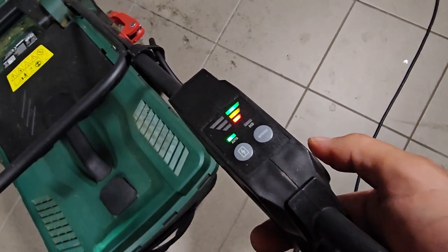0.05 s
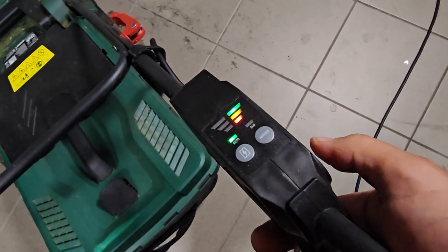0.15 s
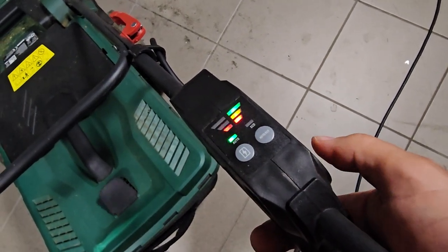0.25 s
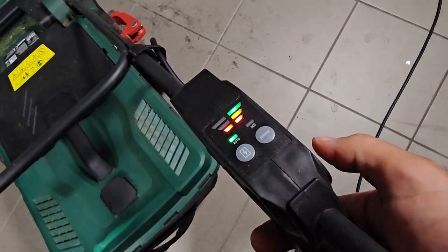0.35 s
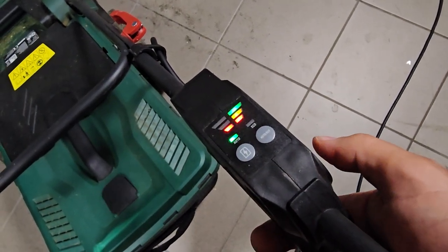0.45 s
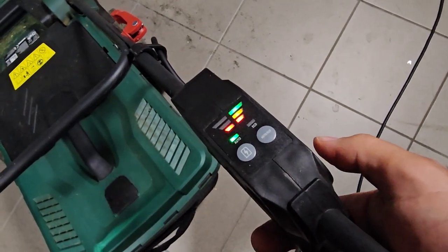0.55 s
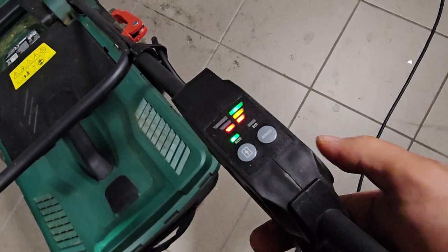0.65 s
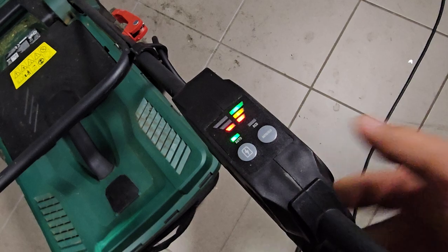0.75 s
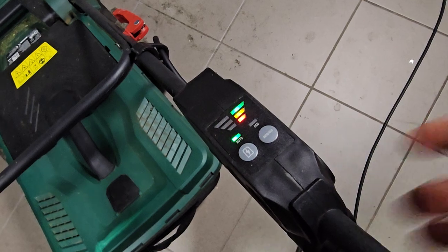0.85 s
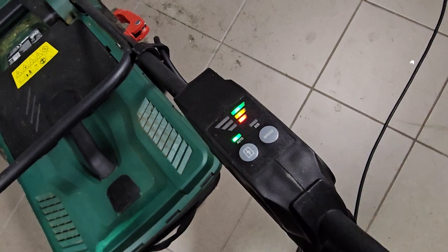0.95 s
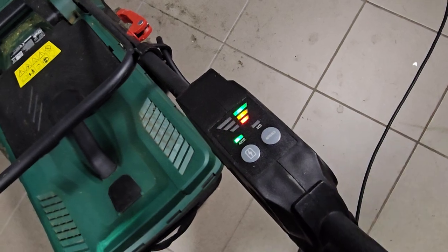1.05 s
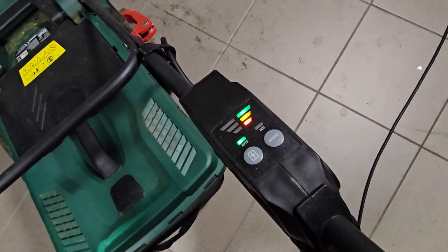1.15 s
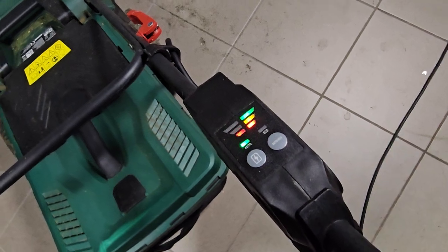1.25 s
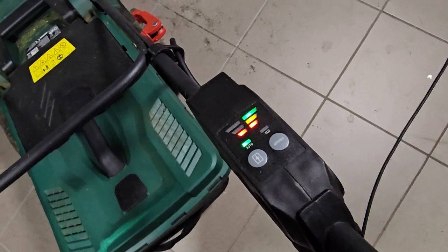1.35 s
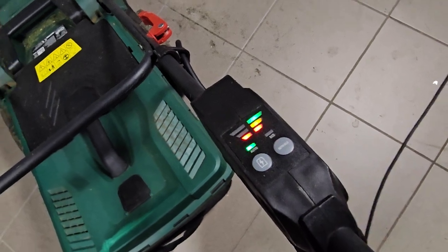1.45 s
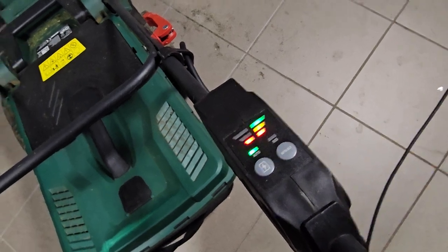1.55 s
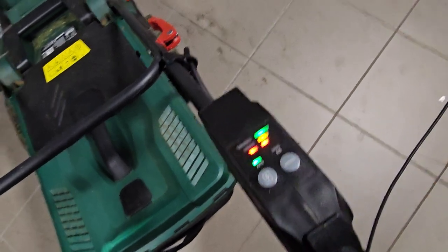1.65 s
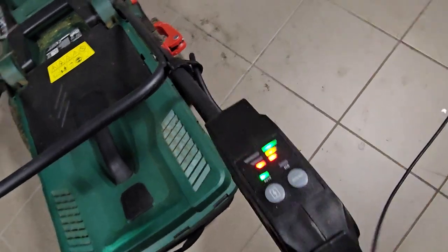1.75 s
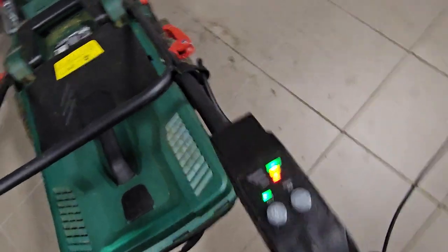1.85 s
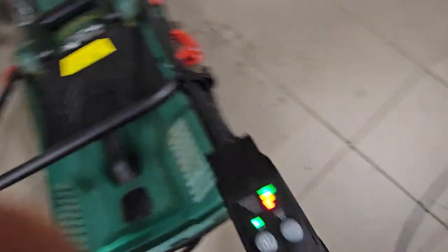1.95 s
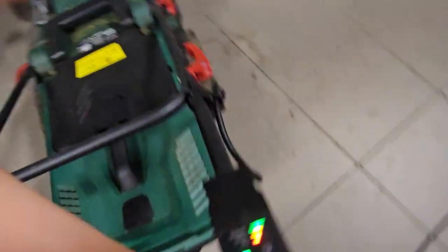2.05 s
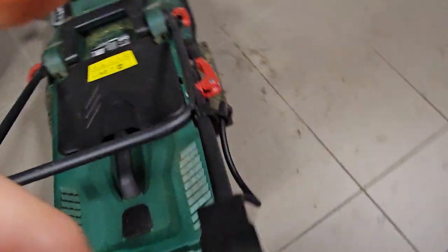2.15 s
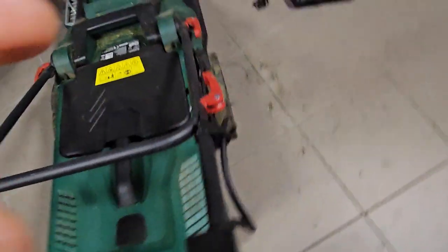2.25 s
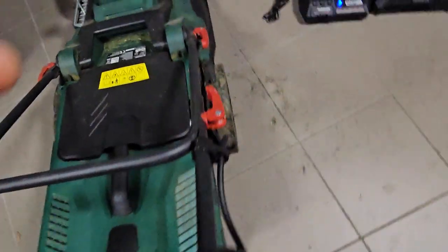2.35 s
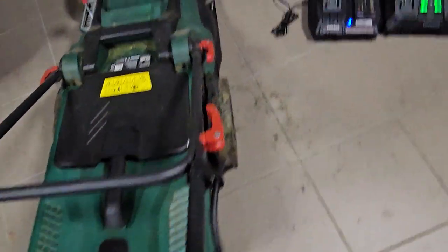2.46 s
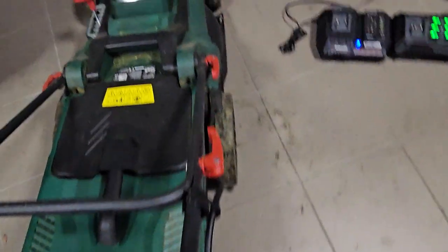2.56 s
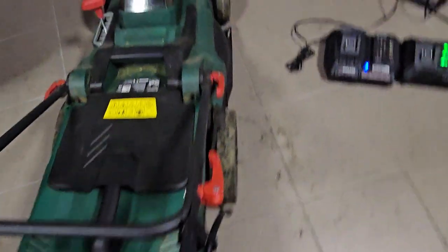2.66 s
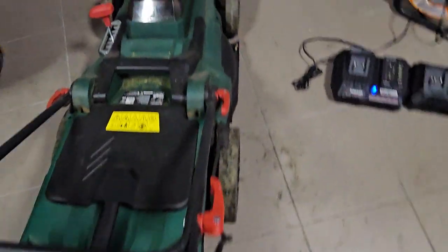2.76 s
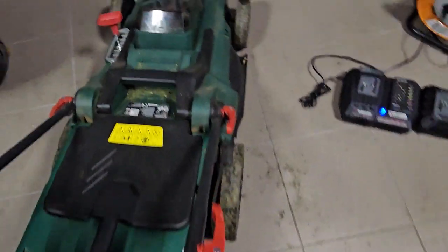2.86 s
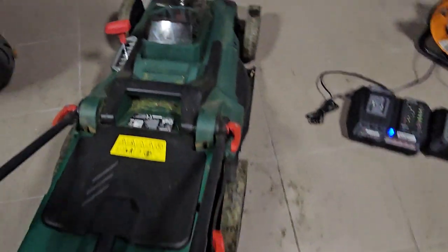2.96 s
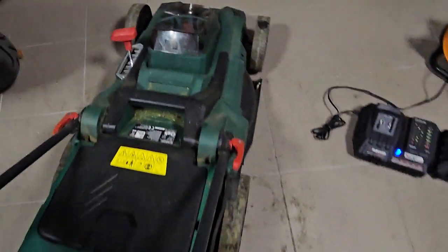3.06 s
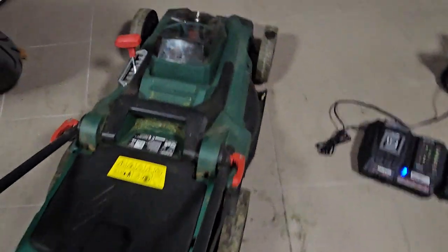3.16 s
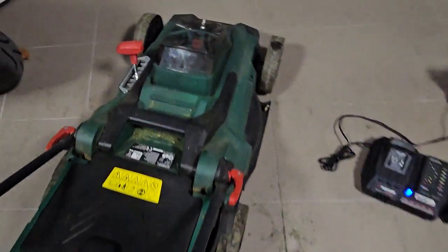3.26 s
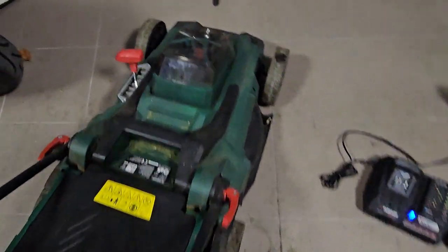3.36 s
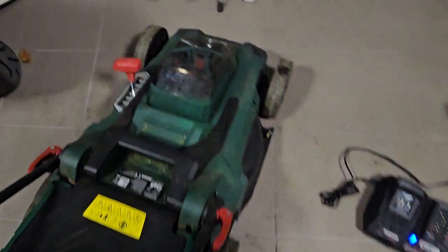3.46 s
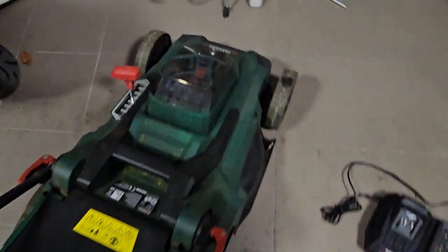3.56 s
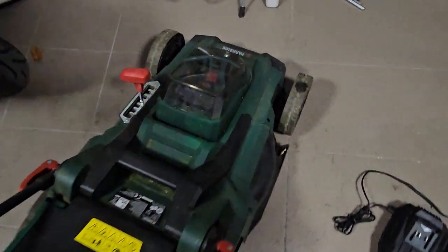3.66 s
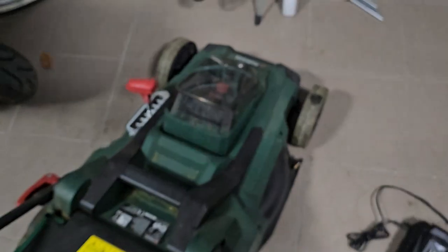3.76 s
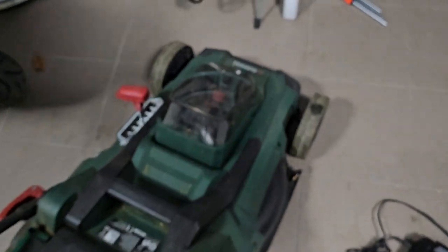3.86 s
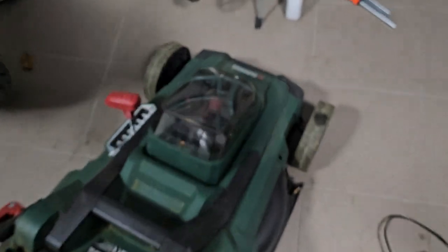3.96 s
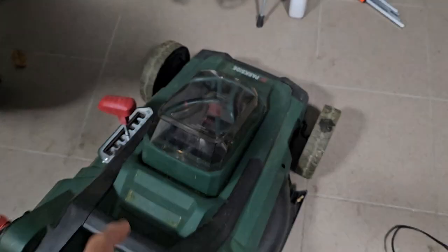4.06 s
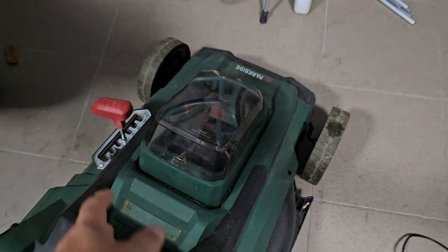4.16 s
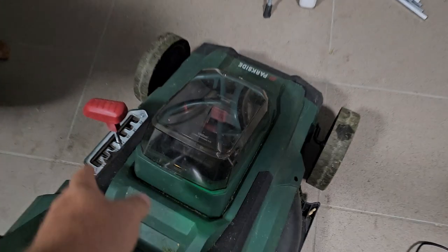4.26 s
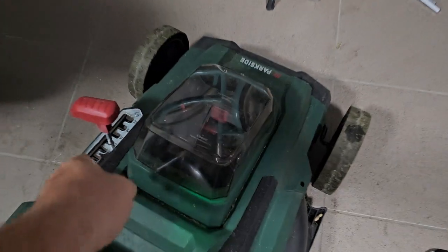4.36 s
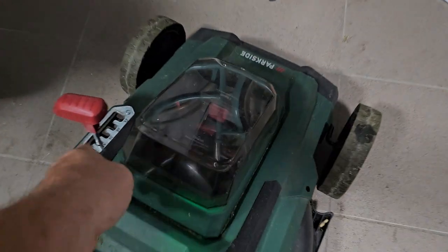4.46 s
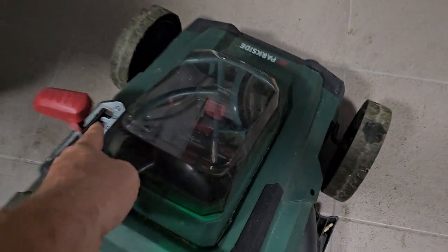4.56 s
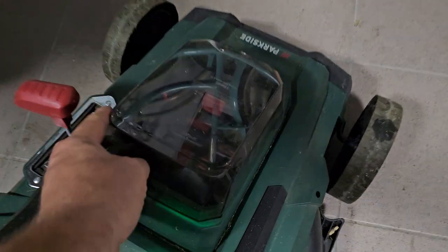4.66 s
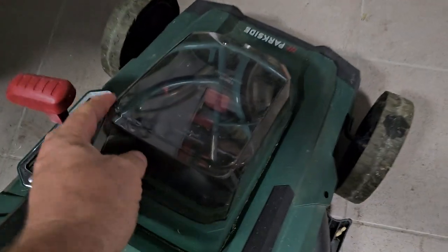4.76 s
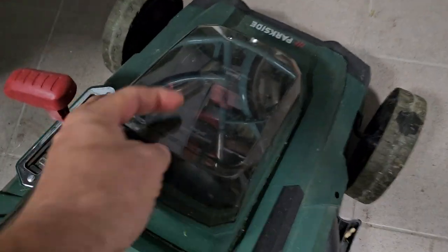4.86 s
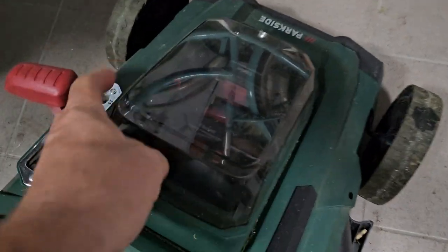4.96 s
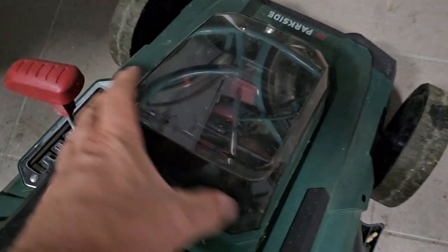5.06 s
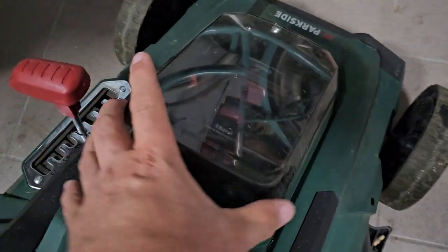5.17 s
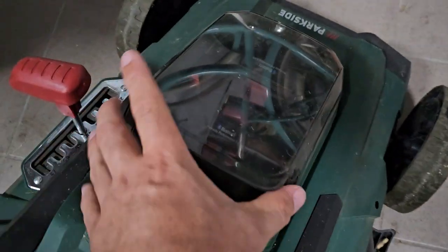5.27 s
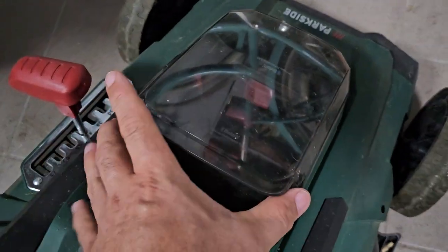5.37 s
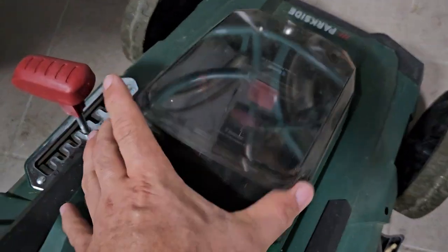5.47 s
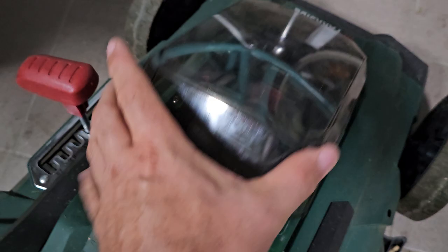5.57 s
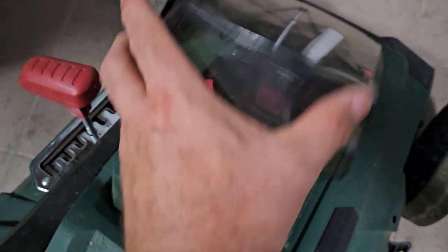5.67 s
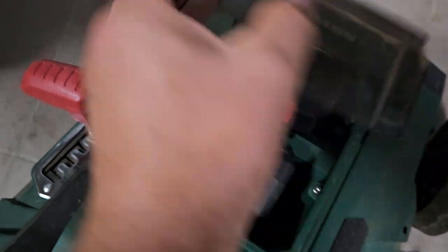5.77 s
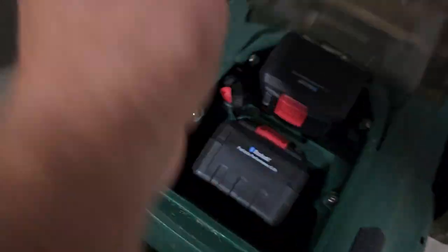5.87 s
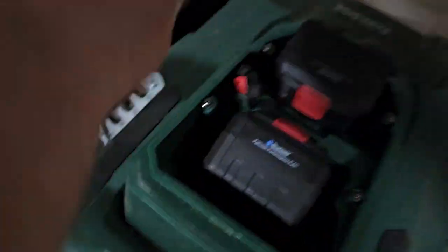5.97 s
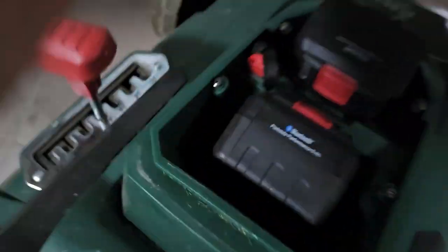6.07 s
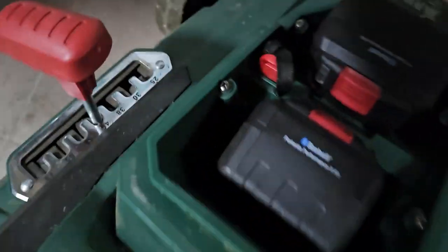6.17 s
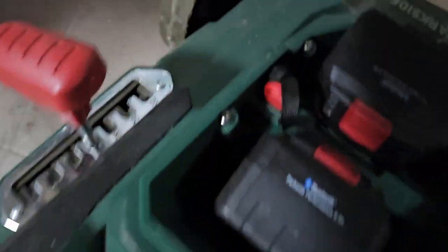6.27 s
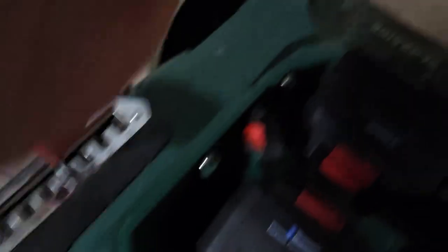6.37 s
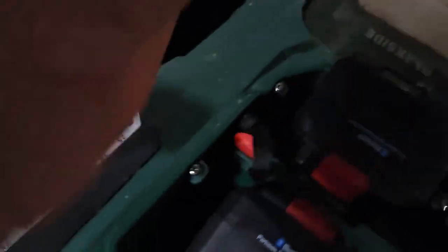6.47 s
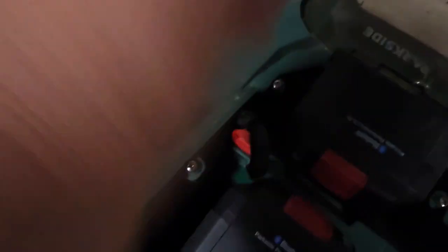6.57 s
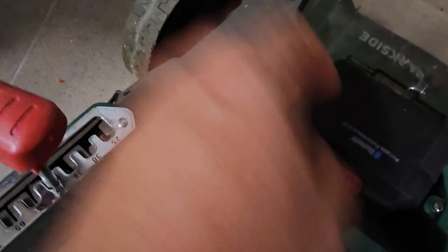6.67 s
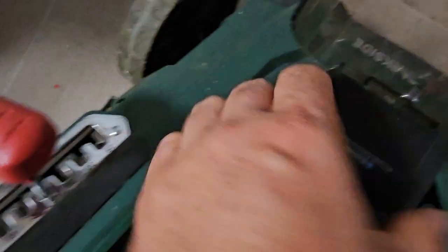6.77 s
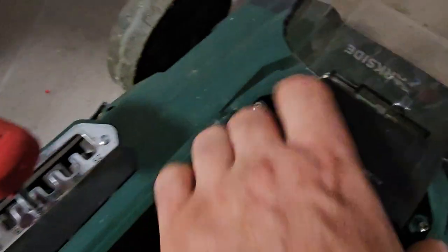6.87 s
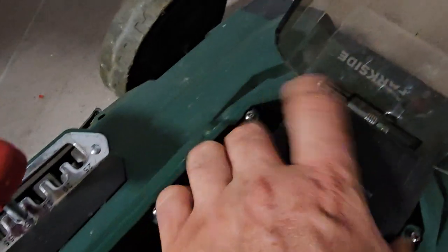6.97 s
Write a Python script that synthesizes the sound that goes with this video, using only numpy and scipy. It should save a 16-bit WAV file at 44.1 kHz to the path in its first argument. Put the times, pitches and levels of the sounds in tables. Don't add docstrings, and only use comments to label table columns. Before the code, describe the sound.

A mower motor whines down and rattles to a stop indoors, then a lever creaks and snaps, with rustling and plastic knocks at a lid.

```python
import sys
import numpy as np
from scipy import signal
from scipy.fft import rfft, irfft
from scipy.io import wavfile
from scipy.ndimage import uniform_filter1d

SR = 44100
rng = np.random.default_rng(int(sys.argv[2]) if len(sys.argv) > 2 else 0)


def level_to_linear(level):
    exponent = np.asarray(level, float) / 20
    return 10 ** exponent


def output_pcm(signal):
    pcm = np.clip(np.atleast_2d(signal).T, -1, 1) * 32767
    wavfile.write(sys.argv[1], SR, np.round(pcm).astype(np.int16))


N = 310023
T = np.arange(N) / SR
RUN = 2 * SR

# (frequency [Hz], level [dB per Hz])
AIR_COLOUR = [(22, -22), (40, -1.5), (60, -9), (193, -26.5), (310, -15.5), (421, -35.5), (512, -18.5),
              (1060, -30), (1850, -22), (2450, -34), (3730, -33), (7510, -37.5), (16000, -40.5)]
AIR_DB = -60.5
# (frequency [Hz], likeness [0-1])
PORT_LIKENESS = [(60, 0.91), (180, 0.92), (550, 0.73), (1650, 0.028), (4970, 0.01), (15000, 0.077)]
# (frequency [Hz], 60 dB decay [s])
WALL_DECAY = [(100, 0.22), (500, 0.61), (2000, 0.45), (6000, 0.13), (15000, 0.04)]
# (shut [s], open [s], depth [dB])
PAUSES = [
    (-3.5, 1.66, -12),
    (3.07, 3.315, -9),
    (3.74, 4.042, -7),
    (4.55, 8, -11.5),
]
# (frequency [Hz], turn [radians])
PORT_PHASE = [(600, 0), (1380, 1.7), (3000, 2)]
MOWER_WET_DB, FAR_WET_DB, NEAR_WET_DB, KNEEL_S = -20, -13, -22, 4.4

# (time [s], left over right [dB])
HAND_SIDE = [(1.6, 1), (2.2, 0.5), (3, -1), (4.3, -3), (4.8, -0.5), (5.6, -1), (6.1, -1.5), (7, -1)]
# (frequency [Hz], level [dB per Hz])
CLOTH_COLOUR = [(300, -25.5), (700, -17.5), (1500, -4.5), (3500, -1), (7500, -2.5), (11000, -7),
                (15500, -7), (16500, -32)]
# (frequency [Hz], level [dB per Hz])
CASING_COLOUR = [(40, -25), (90, -9), (170, 1.5), (270, -1), (370, -15), (600, -24), (1200, -58.5)]
# (peak [s], level [dB], rise [s per 20 dB], fall [s per 20 dB])
GRIP_SHIFTS = [(1.9, -62.5, 0.65, .1), (1.944, -50, 0.088, 0.19), (2.42, -48.5, .03, .05),
               (2.75, -55, 0.055, 0.18), (3.44, -59, 0.036, 0.36), (4.25, -61, 0.42, 0.66),
               (4.455, -50, 0.02, 0.1), (4.71, -52, 0.047, 0.44), (4.92, -35.5, 0.11, 0.17),
               (5.05, -44.5, 0.047, 0.3), (5.5, -53.5, 0.85, 0.2), (5.728, -57.5, 0.27, 0.99),
               (6.422, -52.5, 0.0207, 0.13), (6.602, -53.5, 0.17, 0.028), (7.0, -57, 0.29, .3),
               (4.83, -48, .03, .05), (5.125, -42.5, .03, .06), (6.18, -53.5, .06, 0.084)]
# (peak [s], level [dB], rise [s per 20 dB], fall [s per 20 dB])
SLEEVE_RUBS = [(1.67, -63, .008, .3), (1.77, -51, .09, .25), (2.09, -56, .4, .03), (2.23, -48.5, .1, .4),
               (2.43, -45, .03, .04), (2.762, -51, .02, .16), (3.026, -64.5, .2, .2),
               (3.452, -56.5, .03, .12), (3.638, -49.5, .2, .11), (4.047, -54, .005, .1),
               (4.068, -50, .04, .13), (4.342, -42, .05, .1), (4.365, -42, .06, .04),
               (4.644, -50, .085, .1), (4.96, -47.5, .18, .075), (5.4, -65, .6, .6),
               (5.942, -57.5, .25, .25), (6.25, -55.5, .45, .06), (6.982, -58, .05, .03),
               (6.3, -64, .1, .12), (6.5, -68, .1, .3), (6.932, -60, .005, .2), (6.86, -66, .01, .1)]
# (peak [s], level [dB], rise [s per 20 dB], fall [s per 20 dB])
FINGER_RUBS = [(1.96, -52.5, 0.034, 0.22), (2.13, -40.5, 0.036, 0.13), (3.374, -68, 0.17, 0.102),
               (3.532, -57, 0.032, 0.074), (4.222, -49, 0.14, 0.19), (4.472, -42.5, 0.052, 0.1),
               (5.106, -42.5, 0.099, 0.1), (5.58, -58, 0.17, 0.15), (5.794, -67.5, 0.066, 0.087),
               (6.075, -49.5, 0.078, 0.097), (6.42, -55, 0.0046, 0.14), (6.6, -54, 0.016, 0.048),
               (6.82, -64, .06, 0.18)]
SLEEVE_BODY_DB, FINGER_BODY_DB = -11, -3.5
# (peak [s], level [dB], rise [s per 20 dB], fall [s per 20 dB])
SCRAPES = [(5.562, -48, 0.027, 0.04), (5.59, -41.5, .02, .1), (5.775, -50.5, .01, 0.046),
           (4.785, -52, 0.013, 0.052), (5.672, -48, 0.033, 0.043), (5.805, -51.5, .05, 0.07),
           (6.472, -48, 0.021, 0.036), (6.57, -51.5, .01, 0.04), (6.602, -40, 0.012, 0.04),
           (6.78, -51.5, .006, 0.13), (4.3, -62, 0.33, 0.51), (5.3, -66.5, .3, 0.45),
           (5.42, -57.5, .02, .12), (5.93, -56, 0.011, .06), (6.02, -63, .3, .4),
           (6.075, -48.5, .04, 0.074), (6.828, -50, 0.047, 0.062), (6.94, -58, .02, 0.091),
           (6.982, -49.5, 0.028, 0.022)]
# (frequency [Hz], width [Hz], level [dB])
BAY_MODES = [(440, 92, 4), (900, 380, -2.5), (1324, 124, 1.5), (1990, 150, -3), (3260, 400, -9.5),
             (4300, 880, -8)]

# (frequency [Hz], level [dB per Hz])
LATCH_COLOUR = [(300, -40.5), (700, -16.5), (1930, 1), (2560, -8.5), (3600, -3), (5510, -9), (12900, -12),
                (16000, -28)]
# (time [s], level [dB], pitch [Hz], left over right [dB])
SNICKS = [(2.2, -55.5, 1200, 14.5), (2.103, -30, 3500, 1), (2.1085, -32.5, 3650, 1), (3.366, -55, 7400, -3),
          (3.317, -65.5, 7600, -6.5), (3.869, -64, 6340, -3.5), (3.965, -68, 9000, -2.5),
          (4.4, -49.5, 1960, -3.5), (5.057, -51.5, 2500, -0.5), (6.219, -58, 11000, 1.5),
          (6.243, -55.5, 7000, 1.5), (6.86, -66.5, 11300, -0.5), (3.543, -42.5, 1320, -4),
          (4.211, -39, 1900, -1.5), (4.499, -46.5, 1450, -1.5), (4.96, -40, 2100, 1), (4.3, -50, 1482, -3),
          (6.422, -44, 2000, 2), (1.972, -44.5, 3000, 5), (2.1, -62, 3000, 5), (1.915, -51, 6000, 4),
          (5.573, -43.5, 7920, 0), (6.731, -66, 5000, -1.5), (6.984, -51.5, 4460, -0.5)]
# (time [s], level [dB], pitch [Hz], left over right [dB])
TAPS = [(2.103, -16, 3290, 1), (2.103, -24, 4384, 2), (2.103, -24, 7800, 1.5), (2.103, -21, 11000, 1),
        (2.1085, -18.5, 3210, 1.5), (2.1085, -21.5, 4300, 0.5), (2.1085, -25.5, 7540, 2.5),
        (2.1085, -22, 10500, 3), (1.83, -41, 815, 2.5), (1.95, -39.5, 5310, 4.5), (1.972, -36.5, 1210, 10),
        (1.998, -44, 900, 5), (2.022, -31.5, 580, 5), (2.033, -39.5, 1500, 4), (2.243, -35, 1057, -4.5),
        (2.325, -47.5, 1170, -7.5), (2.779, -40.5, 1620, -9.5), (2.857, -37, 1200, -4.5),
        (2.912, -36.5, 1310, -8), (3.014, -49, 1974, -1), (3.526, -37, 1100, -2), (3.317, -52, 1550, -7),
        (3.345, -44.5, 1576, -8.5), (3.367, -47.5, 2150, -3), (3.22, -56.5, 1850, -3),
        (3.26, -58, 1850, -3), (4.172, -43, 1660, -2), (4.197, -46, 2130, -4), (4.453, -42, 1430, -2.5),
        (5.772, -45, 1320, -2.5), (5.875, -47, 1200, -3.5), (5.924, -46.5, 1600, -2),
        (6.052, -46.5, 1490, -0.5), (4.099, -43.5, 1525, -14), (4.78, -42, 670, 2.5), (4.873, -36, 3200, 5),
        (6.264, -49, 664, -5), (6.466, -48, 890, 5), (6.931, -52, 3780, 1)]
SNICK_CRACK_DB, TAP_CRACK_DB = 11.5, -13
# (time [s], level [dB], treble [dB], thud [dB], ring length [factor])
KNOCKS = [(1.948, -43, -12, -3, 0.57), (2.028, -43, 4, -7.5, 0.2), (4.697, -55.5, -34, 5.5, 0.6),
          (5.057, -47, -20.5, -3, .5), (5.412, -55, -12.5, -6, 0.69), (4.881, -39, -14, -23, 0.41),
          (4.898, -34, -28, -21, 0.48), (4.913, -22.5, -16, -25, 0.3), (4.942, -41, -13, 4, 0.46),
          (5.117, -49, -14, -3.5, 0.73), (5.572, -20, -14, -32, 0.67), (5.584, -17, -4.5, -45, 0.66),
          (5.592, -16.5, -31, -46, 0.7), (5.611, -22.5, -31, -37, 0.9), (5.805, -42.5, -19.5, -19, 0.62),
          (6.071, -44, -10, -24, 0.62), (6.262, -55.5, -10, 2.5, .2), (6.423, -40, -5, 4, 0.93),
          (6.56, -42, -9, -10.5, 0.314)]
# (frequency [Hz], level [dB], 60 dB decay [s])
LID_MODES = [(193.4, -2.5, 0.13), (264, -4.5, 0.11), (362, -4.5, 0.036), (456, 0.5, 0.11), (684, 2, 0.026),
             (1170, -1, 0.15), (1330, 0.5, 0.14), (2010, -6, 0.08), (2210, -8.5, 0.085), (3272, -21, 0.15)]
# (frequency [Hz], level [dB], 60 dB decay [s])
CATCH_MODES = [(205.5, -47, .2), (443, -43, .14), (870, -46, .06), (1491, -37.5, .13), (2090, -42, .1),
               (3400, -47, .2)]
CATCH_S = 6.594
# (frequency [Hz], level [dB], 60 dB decay [s])
SPRING_MODES = [(1070, -3, 0.2), (2756, -14, 0.1), (3284, -8, 0.11), (3898, -12, 0.07), (4400, -16, 0.06)]
SPRING_S, SPRING_DB = 5.658, -42

# (time [s], level [dB], slip rate [slips per s])
CREAK = [
    (2.21, -74, 95),
    (2.26, -50, 100),
    (2.33, -57, 100),
    (2.38, -62.5, 200),
    (2.42, -59.5, 160),
    (2.439, -43.5, 180),
]
# (frequency [Hz], width [Hz], level [dB])
HINGE_MODES = [(3030, 70, 7), (4500, 300, -2), (7900, 500, 2)]
SNAP_S, SNAP_DB = 2.4403, 1
# (frequency [Hz], level [dB per Hz])
BUZZ_COLOUR = [(88, -70.5), (150, -20), (328, -14.5), (544, -19.5), (1290, -20.5), (1700, -18), (1940, -9),
               (2810, -17.5), (4320, -14.5), (6630, -22.5), (16000, -27)]
BUZZ_DB = -26.5
# (frequency [Hz], level [dB], 60 dB decay [s])
BAR_MODES = [(265, -47, .7), (325, -28, 0.14), (1810, -52, 0.2), (1360, -52, 0.25)]
# (frequency [Hz], level [dB], 60 dB decay [s], touched after [s], pitch rise [Hz per s])
BAR_HUM = (296, -60, 4, .66, 150)

# (time [s], level
# [dB])
DECK_KNOCKS = [(0.523, -9.5), (0.538, -8.5), (1.035, -28), (1.079, -26.5), (1.118, -31.5), (1.191, -30.5),
               (1.249, -35), (1.365, -44), (1.417, -42)]
# (frequency [Hz], level [dB], 60 dB decay [s])
DECK_KNOCK_MODES = [(135, -12, .1), (242, -4, .09), (545, 2, .04), (711, -8, .04), (980, -15, .04)]
# (time [s], level [dB])
PINGS = [
    (1.034, -52.5),
    (1.052, -56),
    (1.085, -61),
    (1.105, -63.5),
]
# (frequency [Hz], level [dB], 60 dB decay [s])
BLADE_MODES = [(3365, -2, .3), (3400, -8, .2), (3758, 3, .2), (3800, -4, .12), (4134, -14, .2),
               (4721, -11, .35), (5770, -12, .12)]

# (frequency [Hz], level [dB per Hz])
RUSH_COLOUR = [(35, -43.5), (60, 1.5), (85, -12), (113, -11.5), (189, -6.5), (233, -3), (323, -1.5),
               (389, -12.5), (503, -8.5), (784, -18.5), (2460, -25), (7390, -38.5), (16000, -52)]
# (peak [s], level [dB], rise [s per 20 dB], fall [s per 20 dB])
JOLTS = [
    (.546, -18, 0.16, 0.096),
    (1.038, -39, .008, 0.2),
    (1.252, -51, .008, 0.12),
]
JOLT_AIR_DB = -11
# (peak [s], level [dB], rise [s per 20 dB], fall [s per 20 dB])
BRAKE_HISS = (.82, -44, .6, .05)
RATTLE_DB, RATTLE_LAW, RUSH_DB, RUSH_LAW, SETTLE_DB_PER_S = -17.5, 1, -23.5, 2.26, 135

COAST_HZ, COAST_HZ_PER_S, BRAKE_S, BRAKE_HZ_PER_S, REST_HZ = 91.66, 31, .53, 122, 11.5
# (multiple of shaft speed, level at full speed [dB])
SHAFT_ORDERS = [(2, -32.5), (3, -31), (5, -36.5), (6, -36.5), (7, -36)]
# (multiple of shaft speed, level over the magnet force [dB])
POLE_ORDERS = [(8, -11), (16, 1), (24, -1.5), (32, 0.5), (48, -7)]
# (time [s], level [dB])
MAGNET_FORCE = [(0, -50), (.3, -49), (.42, -37.5), (.54, -27.5), (.68, -32.5), (.78, -34), (.84, -28.5),
                (.9, -34.5), (1.04, -59.5)]
# (frequency [Hz], width [Hz], level [dB])
DECK_MODES = [(136, 10, -2.5), (240.8, 15, 0.5), (316, 6.9, -10), (469.3, 46, -6.5), (533, 120, -3.5),
              (571, 59, -14), (688, 42, -2), (1087, 31, -14), (1345, 200, -5), (1632, 70, -8.5),
              (2250, 80, 0), (2290, 370, -12)]
DIRECT_DB = -18
UNBALANCE_DB, UNBALANCE_LAW, BEAT_DB, BEAT_LAW = -20, 6.2, -25, 3.3
# (peak [s], level [dB], rise [s per 20 dB], fall [s per 20 dB])
MOUNT_SWELL = (.705, -31.5, .09, .07)
# (start [s], hold [s], level [dB], mode [Hz])
BOOMS = [(.607, .08, -10, 243), (.864, .011, -9, 550), (1.005, .03, -31, 250), (1.085, .03, -35, 250),
         (.905, .03, -21, 240), (.975, .04, -28, 140), (.805, .04, -24, 720), (.535, .07, -31, 2270)]
BOOM_SAG_DB, BOOM_EDGE_S, BOOM_SLIP = -5, .014, .7


def evened(x):
    return x / np.sqrt(np.mean(x ** 2) + 1e-20)


def smooth(x, size):
    return uniform_filter1d(x, size=size)


def filtered(x, order, hz, kind):
    return signal.sosfilt(signal.butter(order, hz, kind, fs=SR, output="sos"), x)


def read(points, hz):
    f, value = np.transpose(points)
    return np.interp(np.log(hz + 1), np.log(f + 1), value)


def columns(rows, count=N):
    fade = 0.0085
    s, *rest = np.transpose(rows)
    t = T[:count]
    gate = np.clip(np.minimum(t - s[0] + fade, s[-1] + fade - t) / fade, 0, 1)
    return [np.interp(t, s, c) for c in rest], gate


def add(mix, s, sound, pan_db=0):
    for side, channel in zip((1, -1), mix):
        late = min(round(abs(pan_db) * 2), 12) if side * pan_db < 0 else 0
        part = channel[round(s * SR) + late:][:len(sound)]
        part += sound[:len(part)] * level_to_linear(side * pan_db / 2)


def resonate(x, modes):
    return sum(level_to_linear(db) * signal.lfilter(*signal.iirpeak(hz, hz / width, SR), x) for hz, width, db in modes)


def ring(modes, damping=1, seconds=.25):
    t = np.arange(int(seconds * SR)) / SR
    out = np.zeros(len(t))
    for k, (hz, db, t60) in enumerate(modes):
        strike = rng.uniform(1.4, 2.2) / 2 * (-1) ** k
        out += strike * level_to_linear(db - 60 * t / (t60 * damping)) * np.sin(2 * np.pi * hz * t)
    return out


def flutter(count, size=N):
    return evened(smooth(smooth(rng.standard_normal(size), count), count))


def swells(rows, count=N):
    t, power = T[:count:count // 4000], 0
    for s, db, rise_s, fall_s in rows:
        drop_db = 20 * np.maximum((s - t) / rise_s, (t - s) / fall_s)
        power = power + level_to_linear(2 * (db - drop_db))
    return np.interp(T[:count], t, np.sqrt(power))


def hiss(colour, patchy_db, size=512, count=N):
    frames, hz = count * 2 // size + 5, np.fft.rfftfreq(size, 1 / SR)
    a, b, c, d, patches = (rng.standard_normal((frames, len(hz))) for _ in range(5))
    patches = uniform_filter1d(uniform_filter1d(patches, size=8, axis=1), size=5, axis=0)
    same = np.clip(read(PORT_LIKENESS, hz), -1, 1)
    left = a + 1j * b
    right = same * left + np.sqrt(1 - same ** 2) * (c + 1j * d)
    z = np.array([left, right]) * level_to_linear(read(colour, hz) + patchy_db * evened(patches))
    window = np.sin(np.pi * np.arange(size) / size)
    halves = (irfft(z, size) * window).reshape(2, frames, 2, -1)
    joined = halves[:, 1:, 0] + halves[:, :-1, 1]
    return evened(joined.reshape(2, -1)[:, :count])


def crack(t60):
    t = np.arange(2048) / SR
    puff = rng.standard_normal(len(t)) * level_to_linear(-60 * t / t60)
    puff[0] = 2
    level_db = np.maximum(read(LATCH_COLOUR, abs(np.fft.fftfreq(512, 1 / SR))), -60)
    gain = np.log(level_to_linear(level_db))
    colour = np.fft.ifft(np.exp(signal.hilbert(gain).conj())).real
    puff = np.convolve(puff, colour[:256])
    return puff / abs(puff).max()


def still_air():
    floor = level_to_linear(AIR_DB) * hiss(AIR_COLOUR, 2.1, size=2048)
    bass = filtered(floor, 2, 200, "low")
    gate_db = 0
    for shut, free, db in PAUSES:
        gate_db = gate_db + db * np.clip(np.minimum(T - shut, 8 * (free - T)) / .08 + .5, 0, 1)
    return bass + (floor - bass) * level_to_linear(gate_db - 1.5)


def room(x):
    taps = hiss([(20, 0.0058), (20000, 0.0067)], 0, size=256, count=SR // 2)
    taps[:, :200] = 0
    hz, t, z = signal.stft(taps, SR, nperseg=256)
    fading = z * level_to_linear(-60 * t / read(WALL_DECAY, hz)[:, None])
    tail = signal.istft(fading, SR, nperseg=256)[1]
    return signal.fftconvolve(x, tail / np.linalg.norm(tail[0]), axes=1)[:, :N]


def ports(pair):
    turn = np.exp(1j * read(PORT_PHASE, np.fft.rfftfreq(2 * RUN, 1 / SR)))
    late = irfft(rfft(pair[1, :RUN], 2 * RUN) * turn)[:RUN]
    return np.array([pair[0], np.pad(late, (0, N - RUN))])


def hands():
    cloth = hiss(CLOTH_COLOUR, 1.3) * level_to_linear(2 * flutter(40))
    body = evened(filtered(cloth, 2, [600, 3200], "band"))
    top = evened(filtered(cloth, 1, 1800, "high"))
    rumble = hiss(CASING_COLOUR, 3, size=2048) * level_to_linear(3 * flutter(500))
    sleeve, fingers = swells(SLEEVE_RUBS), swells(FINGER_RUBS)
    rub = np.hypot(level_to_linear(SLEEVE_BODY_DB) * sleeve, level_to_linear(FINGER_BODY_DB) * fingers)
    side = level_to_linear(np.outer([.5, -.5], np.interp(T, *np.transpose(HAND_SIDE))))
    rustle = np.hypot(sleeve, fingers) * top + rub * body
    return side * rustle + level_to_linear(-2.5) * swells(GRIP_SHIFTS) * rumble


def scrapes():
    colour = [(200, 0), (2500, -3), (6000, -10), (16000, -30)]  # (Hz, dB per Hz)
    grains = hiss(colour, 1) * level_to_linear(2.5 * flutter(80))
    return swells(SCRAPES) * evened(resonate(grains, BAY_MODES))


def clicks():
    out = np.zeros((2, N))
    for rows, crack_db in ((SNICKS, SNICK_CRACK_DB), (TAPS, TAP_CRACK_DB)):
        for s, db, hz, pan_db in rows:
            puff = crack(0.011)
            tone = resonate(puff, [(hz, hz / 5, 0)])
            add(out, s, level_to_linear(db) * (level_to_linear(crack_db) * puff + 0.9 * tone / abs(tone).max()), pan_db)
    return out


def knocks():
    out = np.zeros((2, N))
    t = np.arange(SR // 4) / SR
    for s, db, treble_db, thud_db, damping in KNOCKS:
        modes = [(hz * rng.uniform(0.92, 1.03), level + treble_db * (hz > 800), t60)
                 for hz, level, t60 in LID_MODES]
        wobble_db = 4 * evened(smooth(rng.standard_normal(len(t)), 150))
        blow = ring(modes, damping) * level_to_linear(wobble_db)
        thud = level_to_linear(thud_db + 9 - 60 * t / 0.048) * np.sin(2 * np.pi * 110 * t)
        puff = crack(0.07)
        scrape = level_to_linear(treble_db - 7.5) * np.pad(puff, (0, len(t) - len(puff)))
        add(out, s, level_to_linear(db) * (blow / abs(blow).max() - thud + scrape), -1.5)
    add(out, CATCH_S, ring(CATCH_MODES) * level_to_linear(2.5 * flutter(200, SR // 4)), -3)
    add(out, CATCH_S, level_to_linear(-32.5) * smooth(crack(0.1), 2), -3)
    add(out, SPRING_S, level_to_linear(SPRING_DB) * ring(SPRING_MODES), 2)
    return out


def lever():
    (creak_db, rate), gate = columns(CREAK)
    uneven = 1 + .2 * evened(smooth(rng.standard_normal(N), 400))
    slips = np.diff(np.floor(np.cumsum(rate * uneven) / SR), prepend=0)
    push = (slips + 0.02 * rng.standard_normal(N)) * gate * level_to_linear(creak_db + 36)
    out = np.tile(resonate(push, HINGE_MODES), (2, 1))

    snap_modes = [(2000, 2000, 1), (4500, 2000, -5.5), (10040, 5500, -2.5)]  # (Hz, width Hz, dB)
    add(out, SNAP_S, level_to_linear(SNAP_DB) * resonate(crack(0.0084), snap_modes), 3)
    add(out, SNAP_S, ring(BAR_MODES, seconds=0.97))

    hz, db, t60, touch_s, rise = BAR_HUM
    t = T[:SR]
    bent_hz = hz + rise * np.maximum(t - touch_s, 0)
    turn = 2 * np.pi * np.cumsum(bent_hz) / SR + flutter(2500, SR)
    hum = level_to_linear(db - 60 * t / t60 + 2.5 * flutter(1800, SR)) * np.sin(turn)
    add(out, SNAP_S, hum * np.clip((.82 - t) / .08, 0, 1))

    t = T[:SR // 2]
    fall_db = -30 * np.exp(-t / 0.00063) - 135 * np.maximum(t - .035, 0)
    start = round(SNAP_S * SR)
    buzz = hiss(BUZZ_COLOUR, 2.3, size=256, count=len(t)) * level_to_linear(BUZZ_DB + fall_db)
    out[:, start:start + len(t)] += buzz
    return out


def deck_knocks():
    out = np.zeros((2, N))
    for s, db in DECK_KNOCKS:
        modes = [(hz * rng.uniform(.93, 1.05), level + rng.uniform(-4, 4), t60)
                 for hz, level, t60 in DECK_KNOCK_MODES]
        knock = ring(modes)
        soft_start = np.minimum(T[:len(knock)] / 0.0039, 1)
        add(out, s, level_to_linear(db + 0.5) * knock * soft_start, 1.5)
        add(out, s, level_to_linear(db - 14) * smooth(crack(0.18), 14), 1.5)
    for s, db in PINGS:
        add(out, s, level_to_linear(db + 4 * flutter(150, SR // 2)) * ring(BLADE_MODES, seconds=.5), 1.5)
    add(out, PINGS[0][0], level_to_linear(-35) * smooth(crack(.08), 5), 1.5)
    return out


def speed():
    t = T[:RUN]
    coast = COAST_HZ - COAST_HZ_PER_S * np.minimum(t, BRAKE_S)
    hz = coast - BRAKE_HZ_PER_S * np.maximum(t - BRAKE_S, 0)
    return np.maximum(hz, REST_HZ), t[np.argmax(hz < REST_HZ)]


def blade_wind():
    hz, stall_s = speed()
    stir = hz / COAST_HZ * level_to_linear(-SETTLE_DB_PER_S * np.maximum(T[:RUN] - stall_s, 0))
    jolt = swells(JOLTS, RUN)
    rattle = np.hypot(level_to_linear(RATTLE_DB) * stir ** RATTLE_LAW, jolt)
    jolt_air = level_to_linear(JOLT_AIR_DB) * jolt * swells([(1.1, 0.0031, .4, 2.06)], RUN)
    rush = np.hypot(level_to_linear(RUSH_DB) * stir ** RUSH_LAW, jolt_air)
    rush = np.hypot(rush, swells([BRAKE_HISS], RUN))
    air = hiss(RUSH_COLOUR, 1.6, size=1024, count=RUN)
    low = filtered(air, 3, [110, 850], "band")
    high = filtered(air, 3, 850, "high")
    shaken = low * 0.48 + resonate(low, DECK_MODES) * np.clip(hz / 30, .2, 1)
    wind = rattle * shaken + level_to_linear(11.5) * rush * high
    return np.pad(wind, ((0, 0), (0, N - RUN)))


def deck_booms(hz):
    out = np.zeros(RUN)
    for s, hold_s, db, mode_hz in BOOMS:
        since = np.clip(T[:RUN] - s, -1, hold_s + BOOM_EDGE_S)
        edge = np.clip(1 + np.minimum(since, hold_s - since) / BOOM_EDGE_S, 0, 1) ** 2
        middle_hz = hz[round((s + hold_s / 2) * SR)]
        pulled = 2 * np.pi * mode_hz * np.cumsum((hz / middle_hz) ** BOOM_SLIP) / SR
        out += np.sqrt(2) * edge * level_to_linear(db + BOOM_SAG_DB * since / hold_s) * np.sin(pulled)
    return out


def motor():
    (magnet_db,), gate = columns(MAGNET_FORCE, RUN)
    hz = speed()[0]
    turn = 2 * np.pi * np.cumsum(hz) / SR
    force = sum(level_to_linear(db) * np.sin(k * turn + k) for k, db in SHAFT_ORDERS) * (hz / 85) ** 2.1
    for k, db in POLE_ORDERS:
        level = level_to_linear(db + magnet_db + 4 * flutter(300, RUN) - 1)
        force += level * np.sin(k * turn + 1.6 * flutter(330, RUN))
    force += level_to_linear(magnet_db - 17.5) * rng.standard_normal(RUN)
    force = force * gate

    panel = resonate(rng.standard_normal(RUN), [(2330, 220, 0)])
    rubbing = level_to_linear(magnet_db + 15) * np.clip(hz / 36, 0, 1) ** 3
    squeal = panel * np.hypot(rubbing, swells([(.89, -19, .25, 0.098)], RUN))
    deck = level_to_linear(9) * (resonate(force, DECK_MODES) + level_to_linear(DIRECT_DB) * force) + squeal * gate

    held = np.clip(1 + (BRAKE_S - T[:RUN]) / .07, 0, 1)
    unbalance = level_to_linear(UNBALANCE_DB) * (hz / COAST_HZ) ** UNBALANCE_LAW * held
    unbalance = unbalance + swells([MOUNT_SWELL], RUN)
    beat = level_to_linear(BEAT_DB) * (hz / COAST_HZ) ** BEAT_LAW
    hum = np.sqrt(2) * gate * (unbalance * np.sin(turn) + beat * np.sin(4 * turn))
    return np.pad(deck + hum + deck_booms(hz), (0, N - RUN))


def scene():
    port_balance_db = np.array([[.7], [-.7]])
    mower = ports(motor() * level_to_linear(port_balance_db) + deck_knocks())
    near = lever() + clicks() + knocks()
    near_wet_db = np.where(T < KNEEL_S, FAR_WET_DB, NEAR_WET_DB)
    wet = room(mower * level_to_linear(MOWER_WET_DB) + near * level_to_linear(near_wet_db))
    wind = ports(blade_wind()) * level_to_linear(port_balance_db)
    return mower + near + wet + wind + hands() + scrapes() + still_air()


def roll_off(x):
    return signal.sosfilt(signal.butter(12, 16120, fs=SR, output="sos"), x)


def record(dry):
    return roll_off(dry)


dry = scene()
out = record(dry)
output_pcm(out)
```